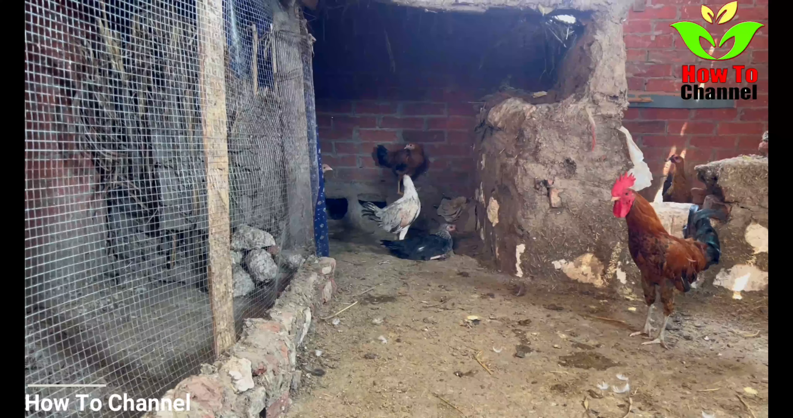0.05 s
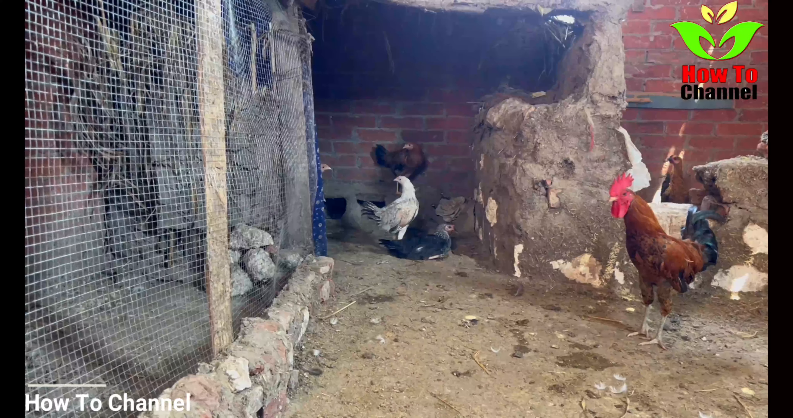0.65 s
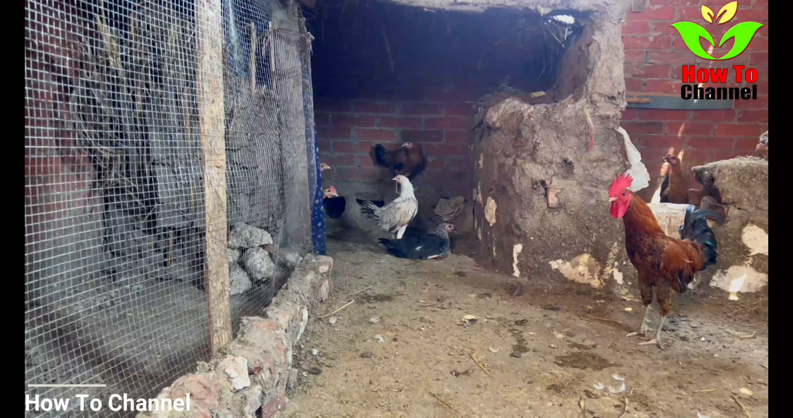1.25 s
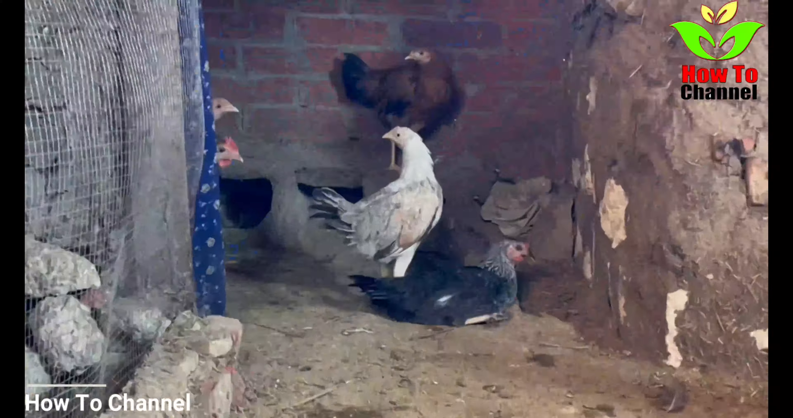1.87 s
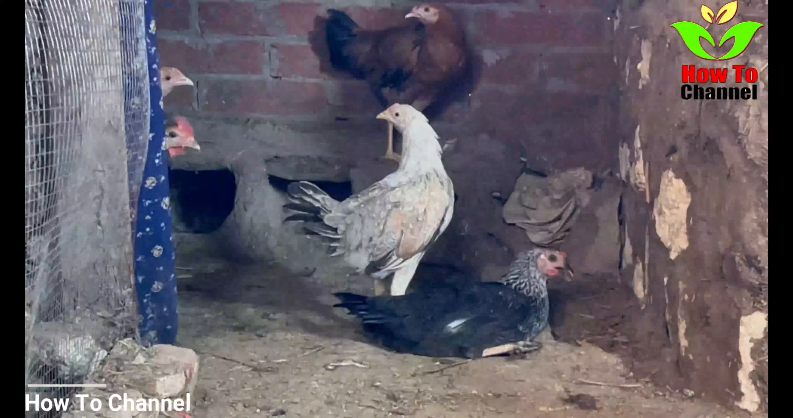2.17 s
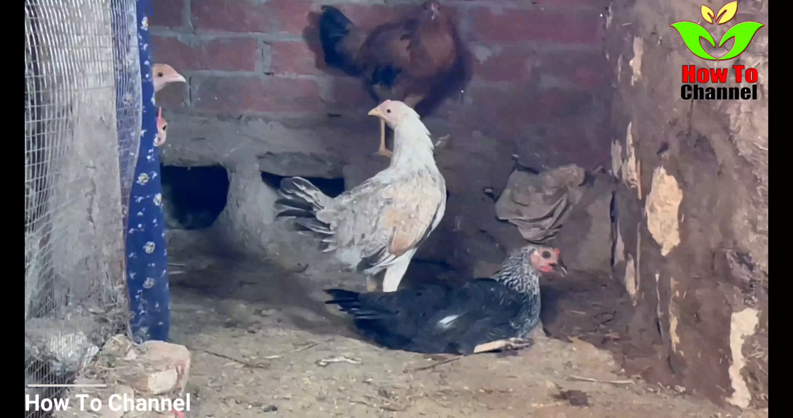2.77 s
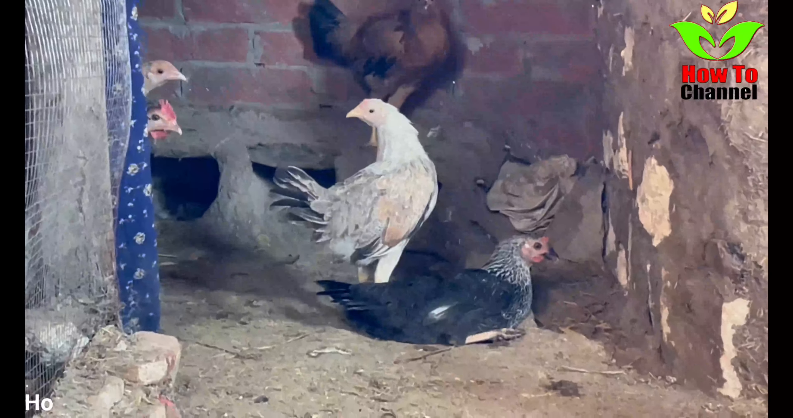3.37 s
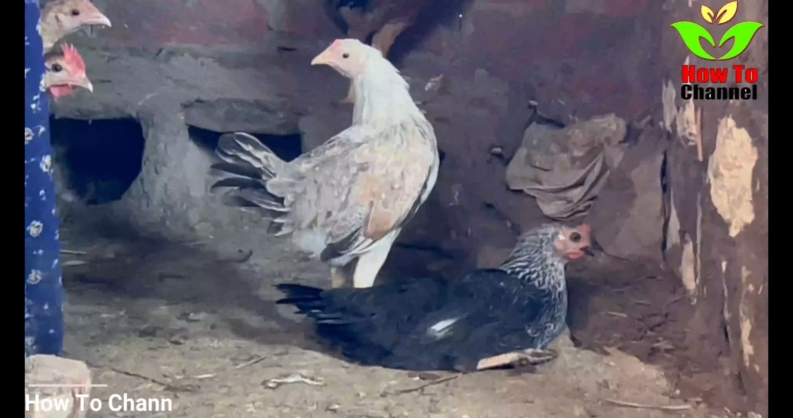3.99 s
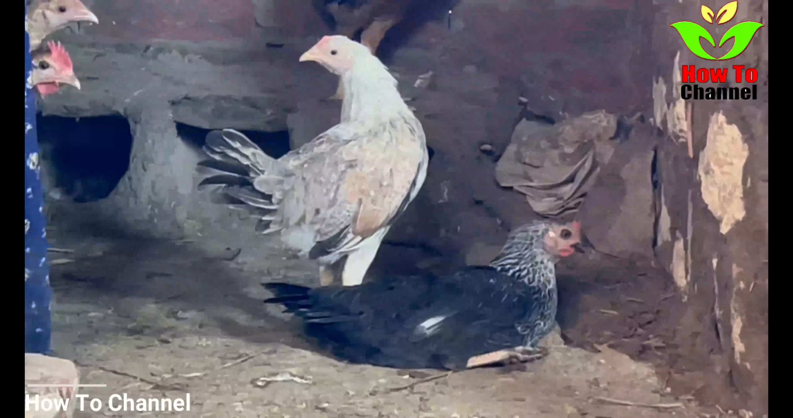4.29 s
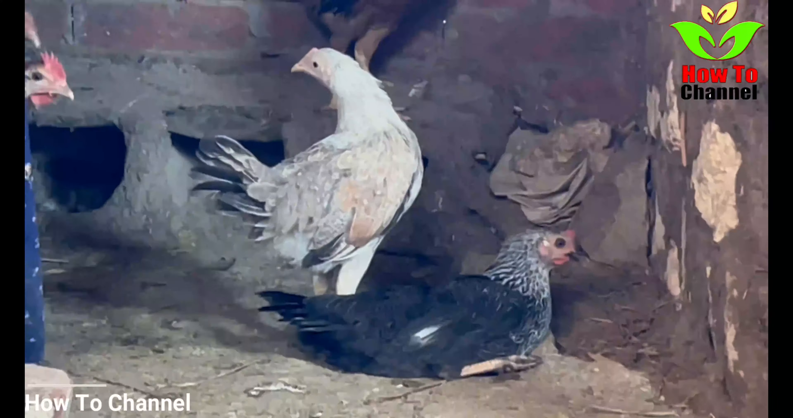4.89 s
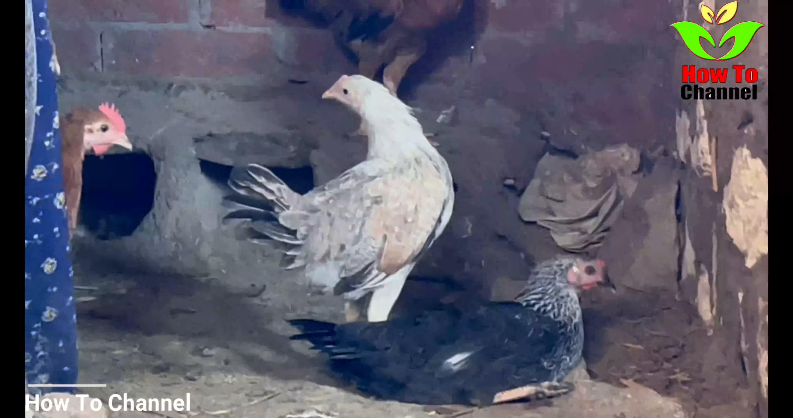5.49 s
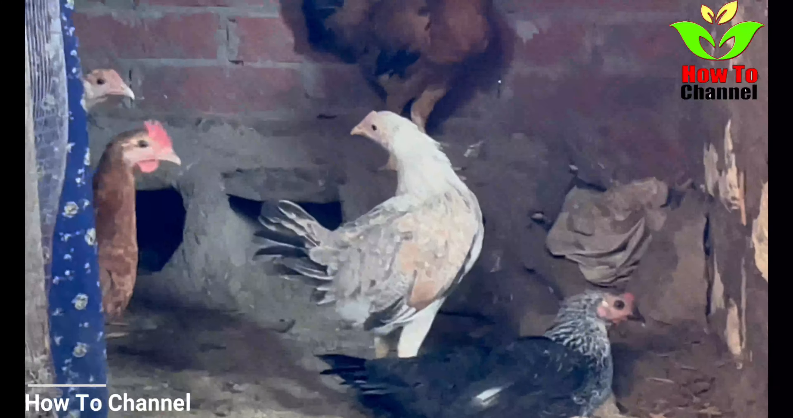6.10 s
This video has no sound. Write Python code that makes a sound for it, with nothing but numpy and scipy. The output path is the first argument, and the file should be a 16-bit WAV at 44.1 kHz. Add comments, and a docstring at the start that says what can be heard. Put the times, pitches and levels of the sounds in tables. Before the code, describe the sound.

A hen grumbles hoarsely, a rooster gives one short loud crow, then sharp, rapid clucks follow inside a small coop.

```python
"""A hen grumbles hoarsely and clucks, close to the microphone in a small brick and mud coop.
A rooster gives one short loud crow, then sharp clucks follow at almost five a second.
Each call is a train of pulses from the syrinx, ringing in the throat and let out by the beak.
The hard walls ring briefly after it. The dry litter rustles twice, very lightly, and
a small bird chirps far off over a low background rumble."""
import sys
import numpy as np
from scipy import signal
from scipy.fft import rfft, irfft
from scipy.io import wavfile
from scipy.ndimage import uniform_filter1d

SR = 44100
rng = np.random.default_rng(int(sys.argv[2]) if len(sys.argv) > 2 else 0)


def wav_record(signal):
    """Record a signal, one row per channel, as 16-bit PCM in the file named by sys.argv[1]."""
    frames = np.transpose(np.atleast_2d(signal))
    bounded = np.clip(frames, -1, 1)
    # unit amplitude maps onto the largest positive 16-bit level
    quanta = np.round(bounded * 32767).astype(np.int16)
    wavfile.write(sys.argv[1], SR, quanta)


N = 275625

# The hen's clucks. Each row: start in seconds, length in seconds, top pitch in Hz, relative level in dB,
# depth of period doubling from 0 to 1, treble in dB.
CLUCKS = [(-.042, 0.06, 472, -37.5, 0.65, 6.5), (1.413, 0.047, 448.6, -31, 0.4, 11),
          (1.71, 0.045, 468.7, -27, 0.15, 8.5), (2.102, .042, 490.5, -27, 0.12, 31),
          (2.438, 0.033, 342.4, -29.5, 0.06, 11.5), (3, 0.043, 653.2, -20.5, 0.12, 6.5),
          (3.209, .049, 512, -19.5, 0.22, 12), (3.428, 0.049, 506.7, -20.5, 0, 10),
          (3.644, 0.051, 507.7, -21, 1, 8.5), (3.873, .051, 507.8, -21, 0.44, 9.5),
          (4.08, .052, 507.6, -19.5, 0.64, 9.5), (4.293, 0.051, 505.4, -19.5, 0.63, 10),
          (4.505, 0.052, 507.4, -21, .7, 9.5), (4.707, .051, 511, -20, 0.76, 10.5),
          (4.918, 0.053, 511, -19.5, 0.53, 8.5), (5.137, 0.049, 506.6, -20.5, 0.55, 9),
          (5.364, 0.048, 496, -21.5, 0.9, 6), (5.76, 0.0416, 462.4, -24, 0.65, -2),
          (5.984, 0.05, 500.6, -21, 0.49, 10.5), (6.212, 0.069, 504.3, -19.5, .2, 11.5)]
# Her hoarse, drawn-out notes. Each row: start, rise and length in seconds, top and slack pitch in Hz,
# relative level and fade in dB, roughness from 0 to 1, treble in dB.
GRUMBLES = [(.346, .047, 0.205, 450.8, 409, -30, 9, .38, 13),
            (0.525, 0.044, 0.239, 480.4, 300.4, -25.5, 24.5, .22, 21),
            (0.792, .031, 0.062, 331.5, 296.7, -41, 7.5, 0.2, -15),
            (1.096, 0.075, 0.19, 458, 424.4, -64, 7.5, 0.34, -11),
            (1.748, 0.035, 0.1174, 400.4, 334.6, -34.5, 15.5, .27, 3),
            (2.514, .008, 0.017, 285, 276, -32.5, -1.5, .6, -13),
            (2.531, 0.018, 0.068, 266.6, 289, -34, 7, .45, -4)]
# The rooster's held note. Each row: time in seconds, level in dB.
CROW_LEVELS = [(2.634, -11.5), (2.688, -14), (2.698, -12.5), (2.802, -16.5), (2.82, -15), (2.842, -11.5)]
# Throat and beak resonances for each kind of call. Each row: centre in Hz, nominal width in Hz,
# level in dB, share that follows the beak's opening (clipped to 0 to 1 in use).
CLUCK_THROAT = [(320, 39, -1.5, 0.06), (515, 314, -10, 0.03), (973.6, 390, 4, 0.32), (1269, 176, 4.5, 0.03),
                (2088, 219, -1, 0.5), (2527, 482, -9, 0.2), (3320, 510, -19.5, 0.9),
                (4213, 900, -27.5, 0.97), (5790, 360, -35.5, 1), (7740, 630, -33, 1),
                (8740, 300, -36.5, 0.98), (11890, 380, -32, 0.7), (14700, 800, -46.5, 0.7)]
GRUMBLE_THROAT = [(386.4, 270, 0, 0.14), (760, 140, 2.5, 0), (1054, 290, 3, 0.53), (1327, 280, 3, 0.33),
                  (1876, 150, -5.5, 0.75), (2360, 560, -10, 0.58), (3300, 1200, -22, 0.16),
                  (5340, 3300, -41, 1), (7100, 2400, -38, 0.64), (11500, 810, -38, 1),
                  (14900, 1100, -38, 0.88)]
CROW_THROAT = [(797, 63, 1, -0.21), (1070, 380, 0.5, -0.38), (1416, 300, 3, -0.5), (1905, 180, 2, 0.94),
               (2140, 830, -2, -0.82), (2990, 1200, -9, 1), (3657, 210, 0, -1.1), (4230, 150, -10, 0.94),
               (4760, 63, -10, 1), (5730, 1100, -25.5, 1), (8330, 900, -16.5, 0.039),
               (11480, 370, -25, 0.6), (14830, 640, -30, 0.54)]
# First echoes off the near walls. Each row: left delay and right delay in seconds, gain in dB.
WALL_ECHOES = [(.0017, .0013, -24), (.0033, 0.00235, -14), (.0056, .0069, -24), (0.0323, 0.028, -11)]
# Stereo image of the coop's ring. Each row: frequency in Hz, left-right likeness from 0 to 1.
COOP_LIKENESS = [(300, 0.24), (1000, 0.027), (2500, .75), (8000, 0.81), (15000, 0.18)]
# Light scratches in the dry litter. Each row: start in seconds, length in seconds, level in dB.
SCRATCHES = [(0.243, 0.018, -71.5), (5.52, 0.036, -72.5)]
# The far bird. Each row: start and length in seconds, first and last pitch in Hz, level in dB.
CHIRPS = [(1.3, 0.054, 1550, 2110, -69), (1.637, 0.078, 1830, 2190, -68)]
# Background rumble and hiss. Each row: frequency in Hz, relative spectral density in dB.
BACKGROUND_SPECTRUM = [(20, -45), (32, -24.5), (44, 4.5), (58, -11), (100, -13.5), (170, -23.5),
                       (300, -31.5), (1200, -43.5), (2500, -49.5), (4000, -59), (8000, -58), (16000, -78)]
# The rumble swells and sinks. Each row: time in seconds, relative level in dB.
RUMBLE_LEVELS = [(0.0, -59.5), (0.19, -57), (0.71, -53), (3.08, -57.5), (3.34, -53), (5.31, -56),
                 (6.25, -59)]

EDGE_DB = 21.5   # a call starts and ends this far under its held level


def clucking():
    """Each cluck swells and arches in pitch; a hard one breaks upward, and most split at their height."""
    soft_db, hard_db = -28.5, -22   # the voice starts to break, and breaks fully
    leap_oct, usual_hz, posture_db = .42, 513, 22
    out = np.zeros(N)
    for start, length, top_hz, db, doubling, treble_db in CLUCKS:
        progress = clock(length) / length
        force = np.clip((db - soft_db) / (hard_db - soft_db), 0, 1)
        break_at = rng.normal(.36, .04)
        broken = .5 + .5 * np.tanh((progress - break_at) / .06)
        arch_oct = (top_hz / usual_hz) ** 4 * (progress - .58) ** 2   # higher clucks bend much more
        pitch = top_hz * 2 ** -np.maximum(leap_oct * force * (1 - broken), arch_oct)
        lost_db = EDGE_DB * edges(progress, attack=.51, release=.13)
        rough = .1 + .26 * (1 - force * broken)
        split = doubling * hump(progress, centre=.58, width=.17)
        controls = pitch, db - lost_db, rough, split, treble_db - 2.5 * lost_db
        # Hard clucks ring in the stretched throat, soft ones in the relaxed, grumbling throat.
        stretched = np.subtract(CLUCK_THROAT, [0, 0, posture_db * (1 - force), 0])
        relaxed = np.subtract(GRUMBLE_THROAT, [0, 0, posture_db * force, 0])
        resonances = np.vstack([stretched, relaxed])
        cluck = call(controls, resonances, jitter=.11, shimmer=.6, hiss=.17, soft_hz=1700, dulling=.15)
        add(out, cluck, start)
    return out


def grumbling():
    """The hen's effort swells to a peak and slackens again; pitch, level and treble follow it."""
    fade_db_per_s, doubling = 133.5, .2
    out = np.zeros(N)
    for start, rise, length, top_hz, slack_hz, db, fade_db, rough, treble_db in GRUMBLES:
        t = clock(length)
        lost_db = np.minimum(fade_db_per_s * np.abs(t - rise), fade_db)
        pitch = top_hz + (slack_hz - top_hz) * lost_db / fade_db
        level_db = db - lost_db - EDGE_DB * edges(t, attack=.017, release=.011)
        controls = pitch, level_db, rough, doubling, treble_db - 1.5 * lost_db
        note = call(controls, GRUMBLE_THROAT, jitter=.25, shimmer=.52, hiss=.37, soft_hz=3500, dulling=.41)
        add(out, note, start)
    return out


def crowing():
    """The rooster's clear loud note, rough at both ends, splits to half pitch midway as the beak closes."""
    start_s, length_s = 2.615, .26
    note_hz, overshoot_hz, sag_hz_per_s, slack_oct = 762.8, 49.1, 70, .55
    beak_open_db, beak_hold_s, closing_db_per_s = 9, .053, 195.5
    out, t = np.zeros(N), clock(length_s)
    held_hz = note_hz + overshoot_hz * hump(t, centre=.042, width=.05) - sag_hz_per_s * t
    slack = edges(t, attack=.028, release=.041)
    pitch = held_hz * 2 ** (-slack_oct * slack)   # scoops up into the note and drops out of it
    level_db = at_time(CROW_LEVELS, start_s + t) - EDGE_DB * edges(t, attack=.019, release=.07)
    rough = .09 * (1 - t / length_s) + .38 * np.sqrt(slack)
    doubling = .42 * hump(t, centre=.125, width=.045)
    treble_db = beak_open_db - closing_db_per_s * np.maximum(t - beak_hold_s, 0) - EDGE_DB * slack
    controls = pitch, level_db, rough, doubling, treble_db
    crow = call(controls, CROW_THROAT, jitter=.055, shimmer=.6, hiss=.47, soft_hz=1600, dulling=.7)
    add(out, crow, start_s)
    return out


def call(controls, resonances, jitter, shimmer, hiss, soft_hz, dulling):
    """Syrinx pulses ring in the throat; weak blowing rounds them off, an open beak lets more treble out."""
    pitch, level_db, rough, doubling, treble_db = controls
    pulses = syrinx(pitch, np.clip(rough, 0, 1), np.clip(doubling, 0, 1), jitter, shimmer, hiss)
    soft = cut(cut(pulses, soft_hz, "low")[::-1], soft_hz, "low")[::-1]   # both ways, so no delay
    sharpness = from_db(dulling * (level_db - level_db.max()))
    body, beak = throat(soft + (pulses - soft) * sharpness, resonances)
    voice = cut(body + from_db(treble_db) * beak, 220, "high")
    power = uniform_filter1d(uniform_filter1d(voice ** 2, size=300), size=200)
    ends = signal.windows.tukey(len(voice), min(1, 200 / len(voice)))
    return from_db(level_db) * ends * voice / np.sqrt(np.abs(power) + 1e-12)


def syrinx(pitch, rough, doubling, jitter, shimmer, hiss):
    """One sharp pulse a cycle, uneven in time and strength when rough, with a puff of air on each."""
    timing_noise, strength_noise = rng.standard_normal((2, 1024))
    air = rng.standard_normal(SR)[:len(pitch)]
    steady = np.cumsum(pitch) / SR
    phase = steady + jitter * rough * np.interp(steady, np.arange(len(timing_noise)), timing_noise)
    cycle = np.round(phase).astype(int)
    offset_samples = (phase - cycle) * SR / pitch
    pulse = np.sinc(.8 * offset_samples) * np.exp(-(offset_samples / 8) ** 2)
    puff = hiss * rough * air * np.cos(np.pi * phase) ** 2
    alternation = 1 + doubling * (-1.) ** cycle   # in period doubling every other pulse is weak
    strength = alternation * np.exp(shimmer * rough * strength_noise[cycle])
    return strength * (pulse + puff)


def throat(x, resonances, size=4096):
    """Steep-sided resonances; gives the part that stays constant and the part that the beak lets out."""
    f = np.arange(size // 2 + 1) * SR / size
    powers = np.array([from_db(2 * db) / (1 + 2 * ((f - hz) / width) ** 2) ** 3
                       for hz, width, db, _ in resonances])
    total = powers.sum(axis=0)
    beak_share = np.clip(np.array(resonances)[:, 3], 0, 1) @ powers / total
    # Folding the cepstrum gives minimum phase: the throat rings after each pulse.
    cepstrum = irfft(np.log(np.sqrt(total) + 1e-5))
    cepstrum[1:size // 2] *= 2
    cepstrum[size // 2 + 1:] = 0
    response = np.exp(rfft(cepstrum))
    rings = [irfft(response * share)[:size // 2] for share in (1 - beak_share, beak_share)]
    return [signal.fftconvolve(x, ring)[:len(x)] for ring in rings]


def near_walls(x, dull_hz=8000):
    """A few echoes off mud and brick, each reaching the microphone's two sides at its own moment."""
    dull, n = cut(x, dull_hz, "low"), np.arange(N)
    out = np.zeros((2, N))
    for *delays, db in WALL_ECHOES:
        out += from_db(db) * np.array([np.interp(n - s * SR, n, dull, left=0) for s in delays])
    return out


def coop(x, bass_t60_s=.24, half_t60_hz=31500, early_db=12, early_s=.008, first_wall_s=.002):
    """Dense reflections scatter round the coop, then leave a tail that dies sooner in the treble."""
    t = clock(.5)
    f = np.arange(len(t) // 2 + 1) * SR / len(t)
    white = rfft(rng.standard_normal((2, len(t))))
    band_edges = np.geomspace(100, 20000, 13)
    response = 0
    for low, high in zip(band_edges, band_edges[1:]):
        hz = np.sqrt(low * high)
        mid, side = irfft(white * ((f >= low) & (f < high)), len(t))
        decay = np.exp(-np.log(1000) * t * (1 + hz / half_t60_hz) / bass_t60_s)
        response = response + stereo(mid, side, at_hz(COOP_LIKENESS, hz)) * decay
    response = response * (t > first_wall_s) * from_db(early_db * np.exp(-t / early_s))
    return signal.fftconvolve(x[None], unit_rms(response) / np.sqrt(len(t)), axes=1)[:, :N]


def scratching(low_hz=1500, high_hz=8000):
    """Dry litter on the floor shifts in short bursts of gritty grains."""
    grains = rng.standard_normal(N) ** 3
    grit = unit_rms(cut(cut(grains, low_hz, "high"), high_hz, "low"))
    bursts = np.zeros(N)
    for start, length, db in SCRATCHES:
        add(bursts, from_db(db) * np.hanning(round(length * SR)), start)
    return bursts * grit


def far_bird():
    """A small bird, a long way off: faint rising peeps whose pitch trembles."""
    out = np.zeros(N)
    tremble = .06 * unit_rms(cut(rng.standard_normal(SR), 300, "low"))
    for start, length, first_hz, last_hz, db in CHIRPS:
        n = round(length * SR)
        pitch = np.linspace(first_hz, last_hz, n) * (1 + tremble[:n])
        add(out, from_db(db) * np.hanning(n) * np.sin(2 * np.pi * np.cumsum(pitch) / SR), start)
    return out


def background():
    """A low background rumble that swells and sinks, with a steady trace of hiss."""
    f = np.arange(N // 2 + 1) * SR / N
    mid, side = irfft(rfft(rng.standard_normal((2, N))) * from_db(at_hz(BACKGROUND_SPECTRUM, f)), N)
    noise = unit_rms(stereo(mid, side, likeness=.96))
    rumble_db = at_time(RUMBLE_LEVELS, np.arange(N) / SR) + .5
    return from_db(rumble_db) * cut(noise, 170, "low") - from_db(-55.5) * cut(noise, 150, "high")


def from_db(db):
    """Decibels to gain."""
    return 10 ** (np.asarray(db) / 20)


def unit_rms(x):
    """Scale to unit power."""
    return x / np.sqrt(np.mean(x ** 2) + 1e-20)


def at_hz(points, hz):
    """Read a table on a log-frequency axis."""
    known, values = np.transpose(points)
    return np.interp(np.log(np.maximum(hz, 1)), np.log(known), values)


def at_time(points, s):
    """Read a table at the given seconds."""
    return np.interp(s, *np.transpose(points))


def clock(length_s):
    """Seconds since the start of a sound."""
    return np.arange(round(length_s * SR)) / SR


def edges(t, attack, release):
    """1 at both ends of a call, easing to 0 where it is held."""
    return np.maximum(1 - t / attack, 0) ** 2 + np.maximum(1 - (t[-1] - t) / release, 0) ** 2


def hump(t, centre, width):
    """A bell curve of height 1."""
    return np.exp(-((t - centre) / width) ** 2)


def add(track, sound, start_s):
    """Mix a sound into a track at a given time."""
    at = round(start_s * SR)
    first, last = max(at, 0), min(at + len(sound), N)
    track[first:last] += sound[first - at:last - at]


def cut(x, hz, kind):
    """Second-order Butterworth low- or high-pass."""
    return signal.sosfilt(signal.butter(2, hz, kind, fs=SR, output="sos"), x)


def stereo(mid, side, likeness):
    """Blend two unrelated signals into a left and right of a given likeness."""
    return np.sqrt(1 + likeness) * mid + np.sqrt(1 - likeness) * side * np.array([[1], [-1]])


def pan(x, left_db):
    """Place a source by its left-minus-right level."""
    return x * from_db([[left_db / 2], [-left_db / 2]])


def scene():
    """At the microphone: hen and rooster near the centre, the walls all round, a low rumble beneath."""
    grumble, cluck, crow = from_db(.1) * grumbling(), from_db(-.54) * clucking(), crowing()
    faint = far_bird() + scratching()
    direct = pan(grumble, left_db=.5) + pan(cluck, left_db=-1.5) + pan(crow, left_db=1.1) + faint
    echoes = near_walls(grumble + cluck + from_db(-4) * crow)
    tail = coop(from_db(-2.5) * grumble + from_db(-2) * cluck + from_db(-3) * crow + from_db(2.5) * faint)
    return direct + echoes + tail + background()


def record(dry, ceiling=.85, cutoff_hz=15900):
    """The recorder rounds off the loudest peaks above the bass and cuts the top steeply."""
    excess = dry - dry / (1 + (dry / ceiling) ** 6) ** (1 / 6)
    rounded = dry - cut(excess, 300, "high")
    return signal.sosfilt(signal.ellip(10, .2, 90, cutoff_hz, fs=SR, output="sos"), rounded)


dry = scene()
out = record(dry)
wav_record(out)
```